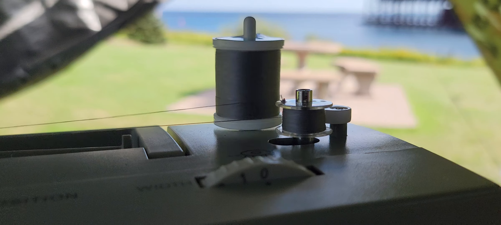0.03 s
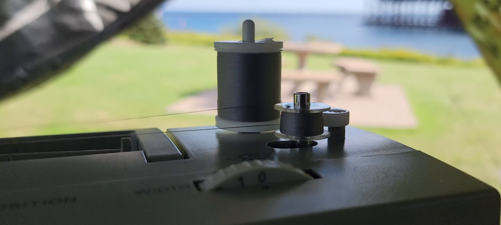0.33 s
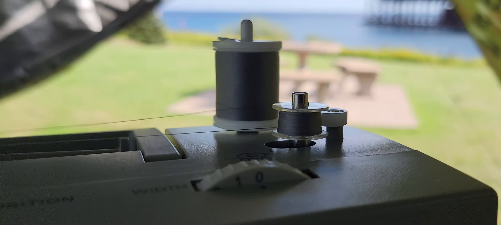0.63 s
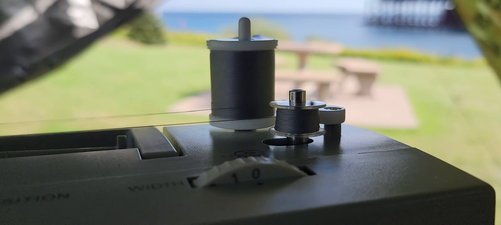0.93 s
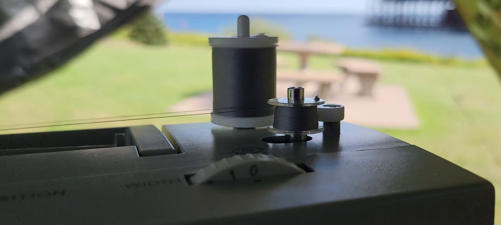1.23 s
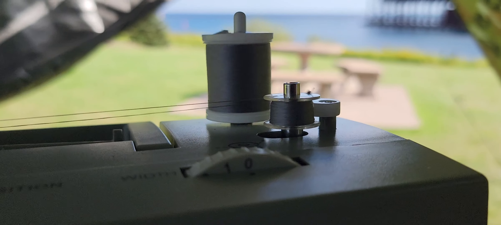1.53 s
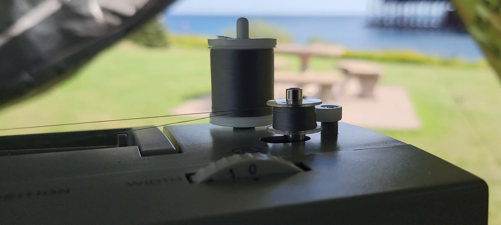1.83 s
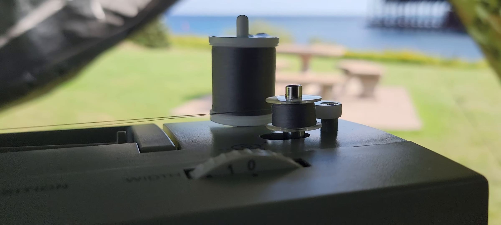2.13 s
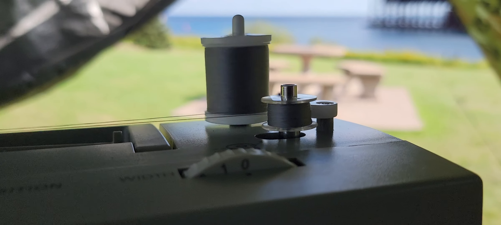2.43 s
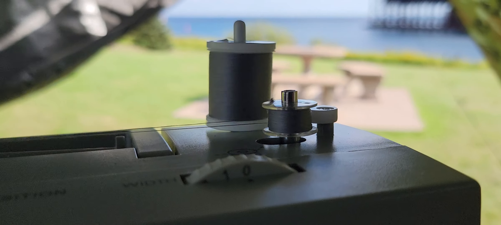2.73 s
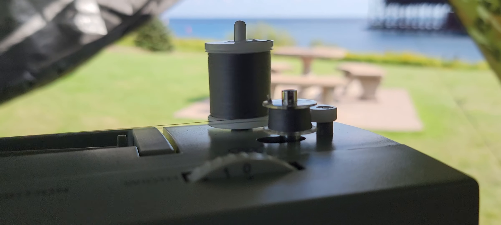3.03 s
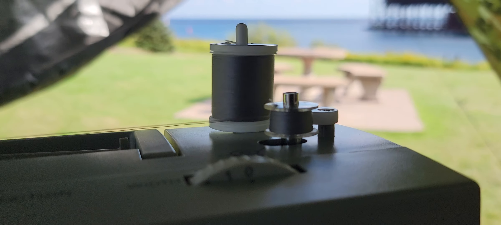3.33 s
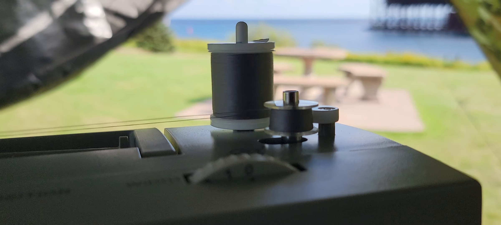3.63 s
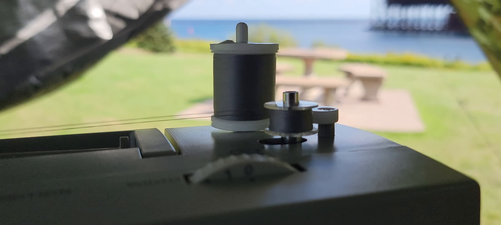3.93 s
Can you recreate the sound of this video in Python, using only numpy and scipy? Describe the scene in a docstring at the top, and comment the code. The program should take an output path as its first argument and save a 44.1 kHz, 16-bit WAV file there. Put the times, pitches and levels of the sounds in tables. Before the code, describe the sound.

A sewing machine winds a bobbin very close by, at full speed from the start, with a steady motor whir and a belt whine pulsing about five times a second. For the first second the handwheel knocks often and the thread spool ticks. From 1.6 to 1.9 seconds the metal bobbin chinks lightly among more knocks. It runs smoothly until scattered knocks and ticks return between 3 and 4 seconds.

```python
"""A sewing machine winds a bobbin outdoors, very close by. The sound cuts in at full speed: motor and
winder spindle each sing their own tones, the belt whines louder once a lap, and the bearings whirr.
For the first second the loose handwheel knocks often and the thread spool ticks on its pin.
Just before two seconds the metal bobbin chinks a few times among more knocks and ticks.
The machine then runs smoothly for a while, until knocks and a few ticks return in the last second."""
import sys
import numpy as np
from scipy import signal
from scipy.fft import rfft, irfft
from scipy.io import wavfile

SR = 44100
rng = np.random.default_rng(int(sys.argv[2]) if len(sys.argv) > 2 else 0)


def dump_mix(stems):
    """Bounce the given channels to the path in sys.argv[1] as a 16-bit WAV at rate SR."""
    frames = np.atleast_2d(stems).T  # one column per channel
    limited = np.clip(frames, -1, 1)  # hard clip at full scale
    pcm = np.round(limited * 32767).astype(np.int16)
    wavfile.write(sys.argv[1], SR, pcm)


N = 176400
T = np.arange(N) / SR
FREQS = np.fft.rfftfreq(N, 1 / SR)

# motor tones: multiple of the motor's pitch, left level/dB, right level/dB
MOTOR_TONES = [(3, -43, -58), (5, -34, -55), (6, -34, -39.5), (7, -43, -53), (8, -56, -60), (19, -44, -42),
               (20, -45, -47), (21, -41.5, -61), (22, -47.5, -64)]
# other hums of the drive: f/Hz, left level/dB, right level/dB
DRIVE_HUMS = [(106.7, -51, -52), (145, -57, -50), (716.4, -35.5, -31.5), (834, -41, -43),
              (1078, -47, -38.5), (1446, -46, -39), (2052, -49, -44), (2303, -59, -38),
              (3280, -47.5, -43.5)]
# how fast the winder spins: t/s, speed/(turns per s)
WINDER_SPEED = [(0, 79.5), (1.1, 79.75), (2.0, 80.05), (3.1, 80.15), (4, 80.45)]
# winder tones: multiple of its speed, left level/dB, right level/dB
WINDER_TONES = [(4, -49.5, -43), (5, -44, -51.5), (12, -45, -40), (15, -47, -47.5), (20, -38, -32),
                (27, -40, -61), (30, -37.5, -40.5), (36, -41.5, -55), (38, -42.5, -57)]
# tight spots of the belt: t/s from the tightest, half length/s, added gain
TIGHT_SPOTS = [(0, .009, 5.4), (-.015, .008, 2.5), (.058, .005, 2.5), (.133, .005, .8)]
# belt squeaks: f/Hz, left level/dB, right level/dB, t/s from the tightest spot, half length/s
BELT_SQUEAKS = [(4050, -41.5, -51, .008, .016), (4840, -52, -56, -.004, .014)]
# how the housing colours noise: f/Hz, left level/dB, right level/dB
HOUSING_COLOUR = [(127, -71.5, -72), (201, -74, -74), (278, -64, -66.5), (382, -57, -61.5), (474, -72, -62),
                  (502, -60, -57.5), (534, -50, -65), (553, -46, -62), (627, -58, -54.5), (643, -47, -67),
                  (726, -66.5, -75), (796, -44.5, -49), (838, -56.5, -59.5), (1012, -62.5, -67),
                  (1057, -62, -53.5), (1140, -60.5, -69.5), (1380, -62, -58.5), (1680, -54.5, -58),
                  (1760, -57, -56.5), (1970, -64, -65), (2230, -60, -63.5), (2800, -69, -67.5),
                  (2990, -63, -67), (3530, -68, -75.5), (5100, -80, -81), (7440, -79, -83),
                  (9300, -91, -92), (11000, -87.5, -85.5), (12600, -81.5, -76), (15800, -78, -82)]
# handwheel knocks: t/s, ring level/dB, clatter level/dB
KNOCKS = [(.080, -2, -7), (.165, -3, -6), (.253, -2.5, -6), (.281, -9.5, -7), (.362, -13, -16),
          (.455, -12, -10), (.548, -11, -15), (.566, -17, -14), (.634, -6, -13), (.718, -8.5, -8.5),
          (.738, -7.5, -19), (.823, -8, -11), (.886, -4, -8.5), (.973, -6, -7), (1.060, -13, -11),
          (1.635, -6.5, -12), (1.704, -16, -11.5), (1.800, -9.5, -21), (1.916, -8.5, -9),
          (3.063, -10.5, -21), (3.235, -8.5, -12), (3.497, -4, -8.5), (3.847, -17, -11.5),
          (3.940, -16, -10)]
# notes of the knocked housing: f/Hz, left level/dB, right level/dB, fade/s (time to drop 60 dB)
HOUSING_NOTES = [(555.7, -3, -16.5, 0.092), (639, -8, -23, 0.046), (831, -12, -15.5, 0.063),
                 (1745, -7.5, -7, 0.034), (2785, -11, -12, 0.028)]
# spool ticks: t/s, level/dB
TICKS = [(0.0796, -15.5), (0.165, -23.5), (0.198, -23), (0.204, -27), (0.254, -23), (0.2826, -20.5),
         (0.3094, -21), (0.4584, -29), (0.5453, -27), (0.7177, -19), (0.885, -24), (0.9711, -21.5),
         (1.0585, -26.5), (1.147, -22.5), (1.3273, -26.5), (1.644, -21.5), (1.654, -22.5), (1.675, -22),
         (1.7695, -18), (1.799, -18.5), (1.891, -29), (3.437, -27), (3.45, -29), (3.466, -30)]
# colour of a tick's snap: f/Hz, level/dB
SNAP_COLOUR = [(300, -12), (1500, 6), (3000, -25), (4500, -7.5), (6400, -2.5), (7700, -0.5), (9500, -16.5),
               (13000, -9.5), (16000, -8)]
# colour of the ring after a tick: f/Hz, level/dB
RING_COLOUR = [(400, -11), (1000, 2), (1700, 0.5), (3100, 7), (4500, -16), (7500, -14), (9500, -25),
               (15000, -43)]
# bobbin chinks: t/s, level/dB
CHINKS = [(1.611, 0), (1.645, 1), (1.665, -9), (1.77, -6), (1.802, -4), (1.892, 1.5)]
# notes of the metal bobbin: f/Hz, level/dB, fade/s
BOBBIN_NOTES = [(2470, -33, 0.072), (3080, -31.5, 0.076), (3230, -35, .05), (4080, -37, 0.03)]
# colour of the low rumble: f/Hz, left level/dB, right level/dB
RUMBLE_COLOUR = [(15, -86, -87), (28, -76, -103), (45, -68, -59), (80, -61, -63), (123, -65, -61.5),
                 (185, -71, -71), (400, -93, -101)]
# how sound reaches the two sides: f/Hz, likeness (1 = fully alike), left side's lead/rad
STEREO = [(100, .97, .05), (220, .85, 0), (400, .8, 1.3), (540, .75, 2.3), (720, .75, 2.1),
          (790, .85, 1.25), (900, .7, 1.4), (1100, .6, 2.4), (1500, .45, 2.2), (3000, .4, 1.5),
          (6000, .3, 1.55), (13000, .3, 1.7)]

MOTOR_HZ = 122.1
BELT_LAP_S, FIRST_TIGHT_S, TEETH_PER_TURN = .2119, .049, 10


def motor():
    """The motor sings at multiples of one steady pitch; the drive's other hums waver more."""
    hz = MOTOR_HZ * (1 + .00018 * drift(6.3))
    singing = sum(tone(multiple * hz, db, flutter_db=1.9) for multiple, *db in MOTOR_TONES)
    hums = sum(tone(f * (1 + .0015 * drift(8.7)), db, flutter_db=2) for f, *db in DRIVE_HUMS)
    return singing + hums


def winder(speed):
    """The winder spindle sings at multiples of its wavering speed."""
    return sum(tone(multiple * speed, db, flutter_db=2.5) for multiple, *db in WINDER_TONES)


def belt(speed):
    """The belt's teeth whine, louder at each tight spot; the tightest bends the pitch and squeaks."""
    def time_from(spot):
        return (T - FIRST_TIGHT_S - spot + BELT_LAP_S / 2) % BELT_LAP_S - BELT_LAP_S / 2

    def swell(spot, half_s):
        return np.exp(-(time_from(spot) / half_s) ** 2)

    grip = 1 + sum(gain * swell(spot, half_s) for spot, half_s, gain in TIGHT_SPOTS)
    bend_hz = 900 * time_from(0) * swell(0, half_s=.025)  # slides upward through the tightest spot
    squeaks = sum(swell(spot, half_s) * tone(f * speed / speed.mean(), (left, right), flutter_db=2)
                  for f, left, right, spot, half_s in BELT_SQUEAKS)
    whine = tone(TEETH_PER_TURN * speed + bend_hz, (-37.3, -41.3), flutter_db=.6)
    return grip * whine + squeaks


def bearings(speed):
    """Grainy rubbing whirrs in the housing: the lows chatter, the highs pulse with spindle and motor."""
    spindle_pulse = .016 * np.cos(2 * np.pi * np.cumsum(speed) / SR)
    motor_pulse = .024 * np.cos(2 * np.pi * 2 * MOTOR_HZ * T)
    chatter = (1 + .24 * np.cos(2 * np.pi * 34.4 * T)) * amp(1.34 * drift(56))
    rubbing = stereo_noise() * amp(1.2 * drift(220))
    low_share = 1 / (1 + (FREQS / 940) ** 4)  # lows give way to highs at 940 Hz
    lows = low_share * rfft(rubbing * chatter)
    highs = (1 - low_share) * rfft(rubbing * (1 + spindle_pulse + motor_pulse))
    # the housing favours some high pitches: small random peaks and dips, on steps of 24 Hz
    steps_hz = np.arange(0, SR / 2, 24)
    heights = rng.standard_normal((2, SR))[:, :len(steps_hz)]
    ripple = np.array([np.interp(FREQS, steps_hz, side) for side in heights])
    peaks = amp(np.clip(1.9 * ripple, -4, 4) * (1 - low_share))
    return colour(irfft((lows + highs) * peaks, N), HOUSING_COLOUR)


def handwheel_knocks():
    """Each knock of the loose handwheel makes the housing ring and its parts clatter briefly."""
    t = T[:SR // 5]
    rings, clatter = np.zeros((2, N)), np.zeros((1, N))
    rise = 1 - np.exp(-(t / .0043) ** 2)
    for start, ring_db, clatter_db in KNOCKS:
        for hz, left, right, fade_s in HOUSING_NOTES:
            angle = 2 * np.pi * (hz * t + rng.random())
            lead = look_up(STEREO, hz)[1]
            note = amp([[left], [right]]) * np.sin([angle, angle - lead])
            add(rings, start, note * rise * fade(t, ring_db + 1.5, fade_s))
        burst = rise * fade(t, clatter_db + 18.5, fade_s=.066)
        add(clatter, start, burst[None])
    return rings + colour(stereo_noise() * clatter, HOUSING_COLOUR)


def spool_ticks():
    """The spool taps its pin: a bright snap and a duller ring, mostly on the left."""
    t = T[:SR // 5]
    loudness = np.zeros((2, N))
    for start, db in TICKS:
        snap = fade(t, db + 5.5, fade_s=.014)
        ring = fade(t, db + 1.5, fade_s=.12) * (1 - np.exp(-t / .00086))
        add(loudness, start, np.array([snap, ring]))
    snaps, rings = loudness[:, None] * rng.standard_normal((2, 2, N))
    return (colour(snaps, SNAP_COLOUR) + colour(rings, RING_COLOUR)) * amp([[2.5], [-2.5]])


def bobbin_chinks():
    """The metal bobbin rattles on its spindle and rings briefly, mostly on the left."""
    t = T[:SR // 5]
    rings = np.zeros((2, N))
    for start, db in CHINKS:
        for hz, note_db, fade_s in BOBBIN_NOTES:
            angle = 2 * np.pi * (hz * t + rng.random((2, 1)))
            add(rings, start, fade(t, db + note_db, fade_s) * np.sin(angle))
    return rings * [[2], [1]]


def rumble():
    """The machine shakes with a low noise that both sides share."""
    shaking = rng.standard_normal(N) * np.sqrt(SR / 2)
    return colour(shaking, RUMBLE_COLOUR)


def tone(hz, levels_db, flutter_db):
    """One stereo tone that follows the pitch curve hz while its loudness flutters."""
    angle = 2 * np.pi * (np.cumsum(hz) / SR + rng.random())
    lead = look_up(STEREO, hz.mean())[1]
    flutter = amp(flutter_db * drift(10))
    flutter *= np.sqrt(2 / np.mean(flutter ** 2))  # keeps the average level at levels_db
    return flutter * amp(levels_db)[:, None] * np.sin([angle, angle - lead])


def stereo_noise():
    """An even hiss whose two sides are alike in the lows and less so in the highs."""
    left, other = rfft(rng.standard_normal((2, N)))
    likeness, lead = look_up(STEREO, FREQS)
    right = (likeness * left + np.sqrt(1 - likeness ** 2) * other) * np.exp(-1j * lead)
    return irfft(np.array([left, right]), N) * np.sqrt(SR / 2)


def drift(per_s):
    """A smooth random wobble of typical size 1 that changes up to about per_s times a second."""
    wobble = irfft(rfft(rng.standard_normal(N)) * np.exp(-(FREQS / per_s) ** 2), N)
    return wobble / wobble.std()


def amp(db):
    """Turns decibels into a number to multiply by."""
    return 10 ** (np.asarray(db) / 20)


def fade(t, db, fade_s):
    """Starts at the level db and drops 60 dB every fade_s seconds."""
    return amp(db - 60 * t / fade_s)


def look_up(table, hz):
    """Reads a table's columns at hz, sliding between rows along a pitch scale."""
    f, *columns = np.transpose(table)
    return np.array([np.interp(np.log(hz + 1), np.log(f + 1), column) for column in columns])


def colour(sound, table):
    """Turns each frequency of a sound up or down as the table says."""
    return irfft(rfft(sound) * amp(look_up(table, FREQS)), N)


def add(mix, start, sound):
    """Adds a sound to the mix, start seconds in."""
    part = mix[:, round(start * SR):][:, :sound.shape[1]]
    part += sound[:, :part.shape[1]]


def scene():
    """All parts of the running machine, cutting in together."""
    speed = np.interp(T, *np.transpose(WINDER_SPEED)) * (1 + .0018 * drift(14))
    running = motor() + winder(speed) + belt(speed) + bearings(speed) + rumble()
    rattles = handwheel_knocks() + spool_ticks() + bobbin_chinks()
    cut_in = np.clip((T - .079) / .001, 0, 1)
    return (running + rattles) * cut_in


def record(dry):
    """Takes away the very highest treble, above about 16 kHz."""
    treble_cut = signal.firwin(511, 16020, window=("kaiser", 9), fs=SR)
    return signal.oaconvolve(dry, treble_cut[None], "same")


dry = scene()
out = record(dry)
dump_mix(out)
```